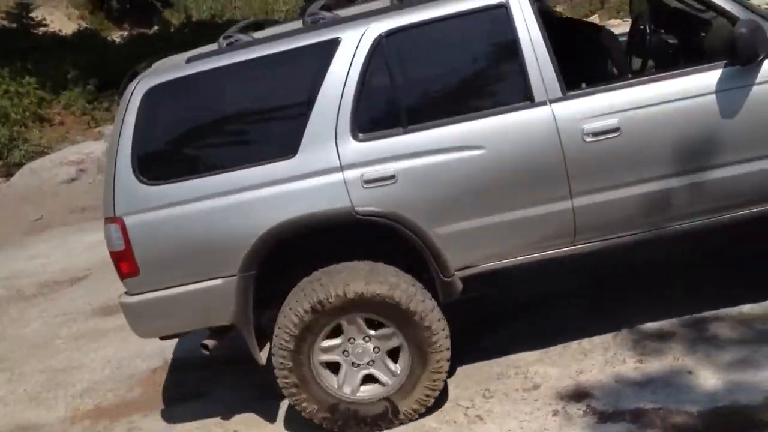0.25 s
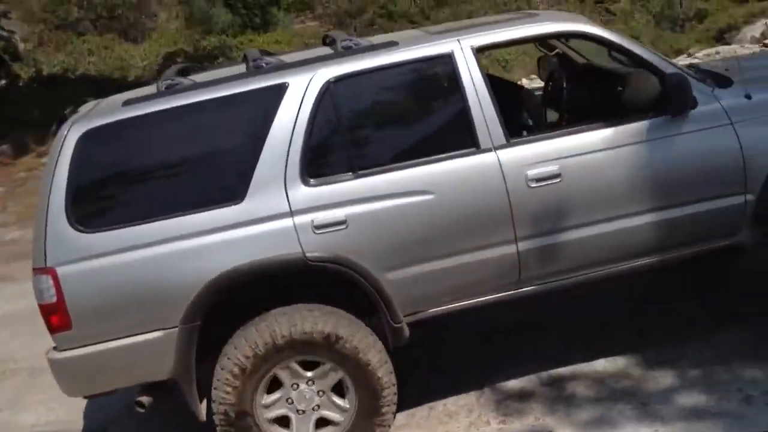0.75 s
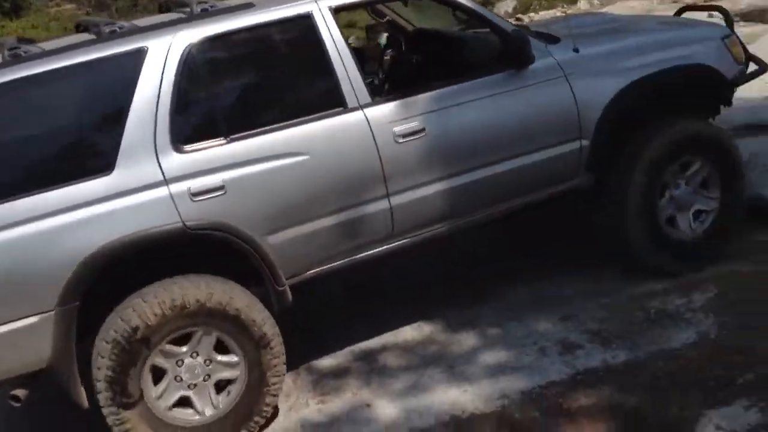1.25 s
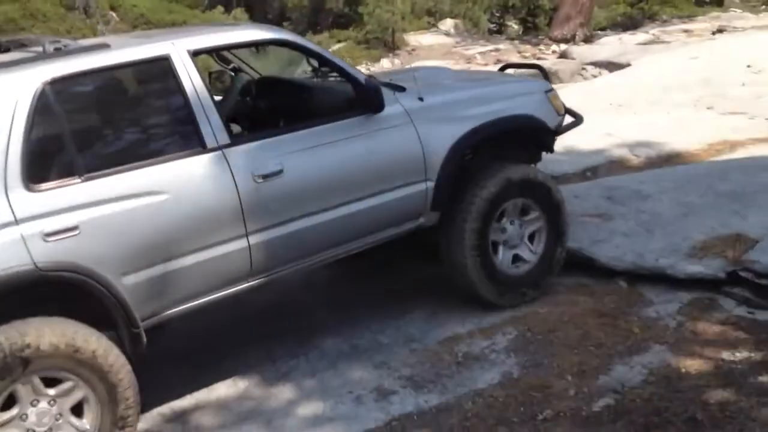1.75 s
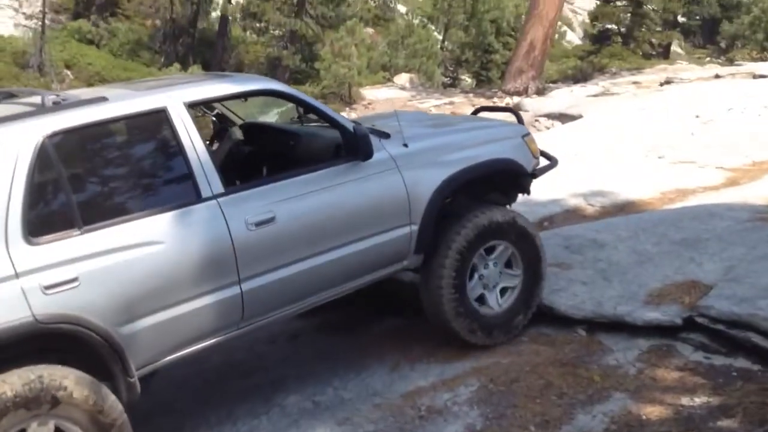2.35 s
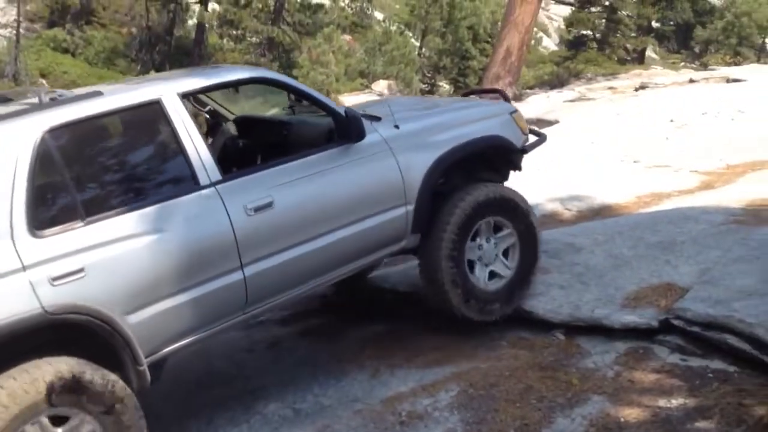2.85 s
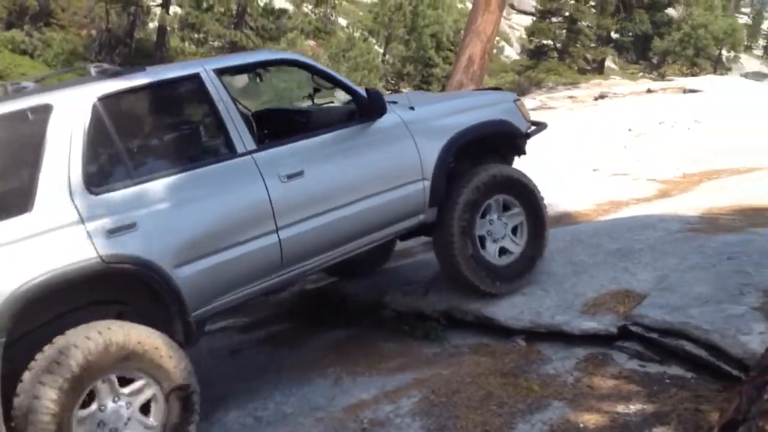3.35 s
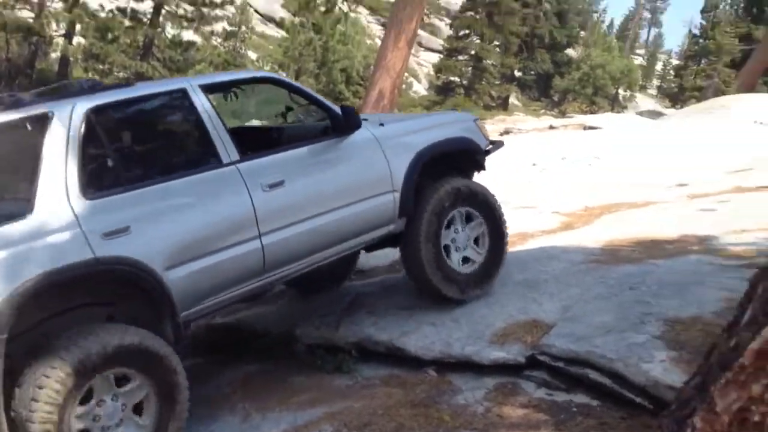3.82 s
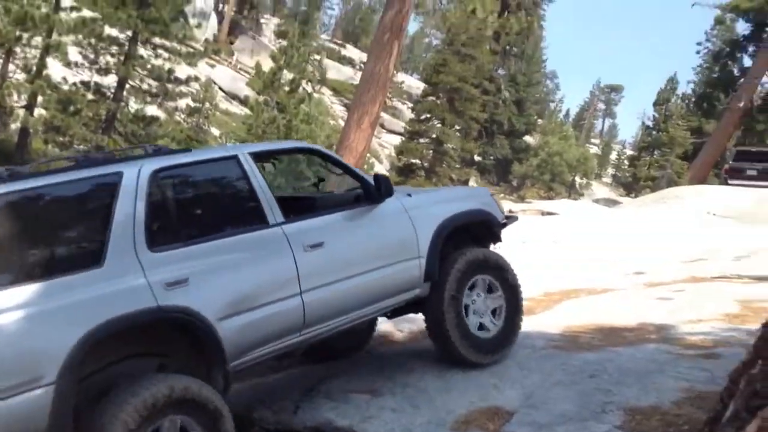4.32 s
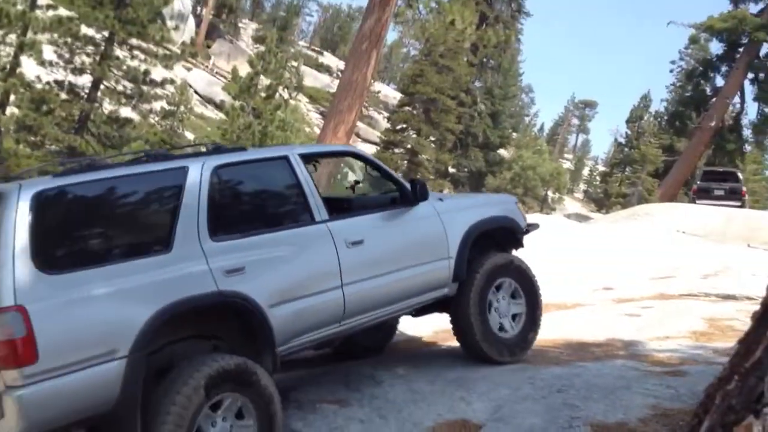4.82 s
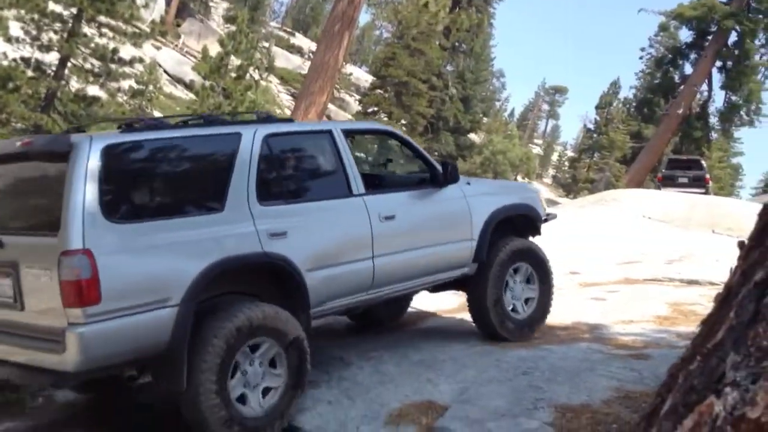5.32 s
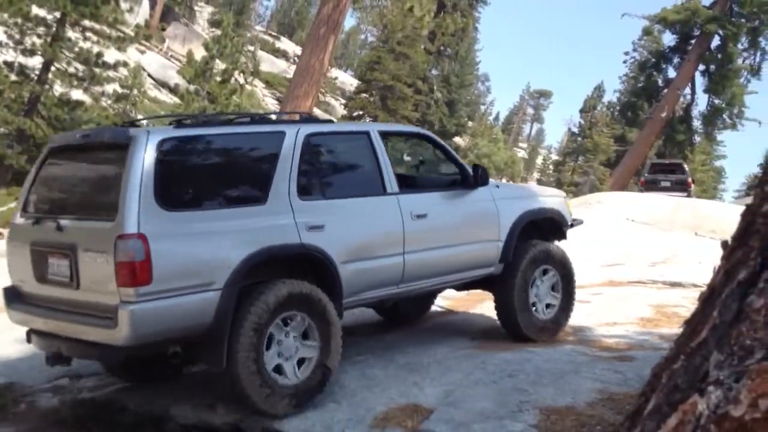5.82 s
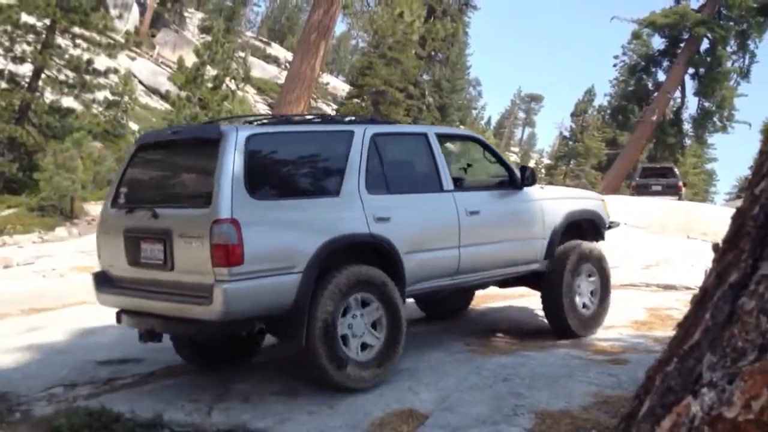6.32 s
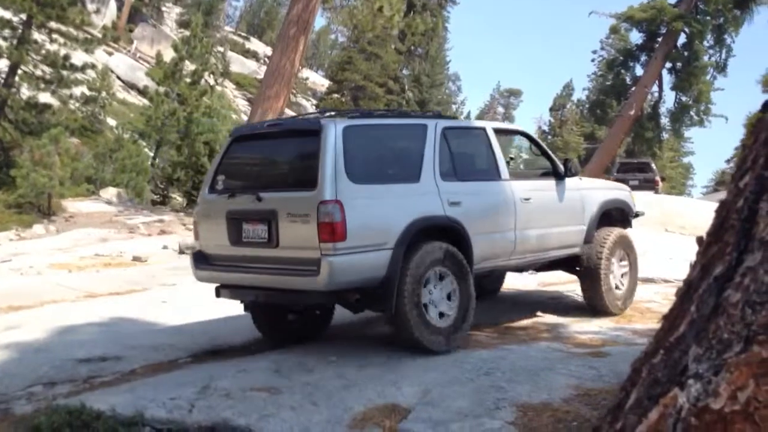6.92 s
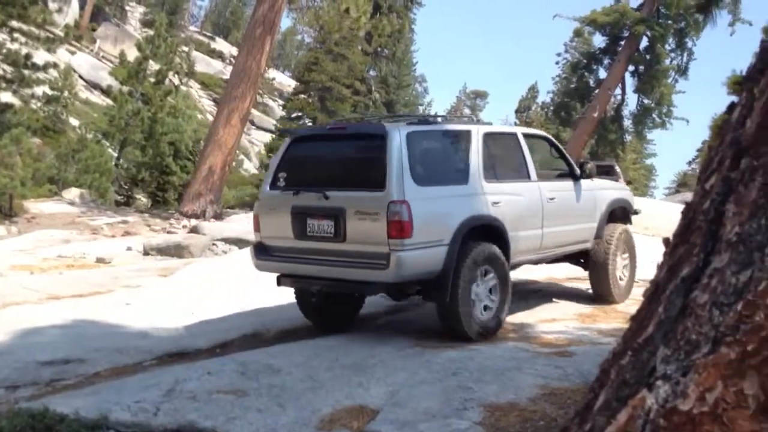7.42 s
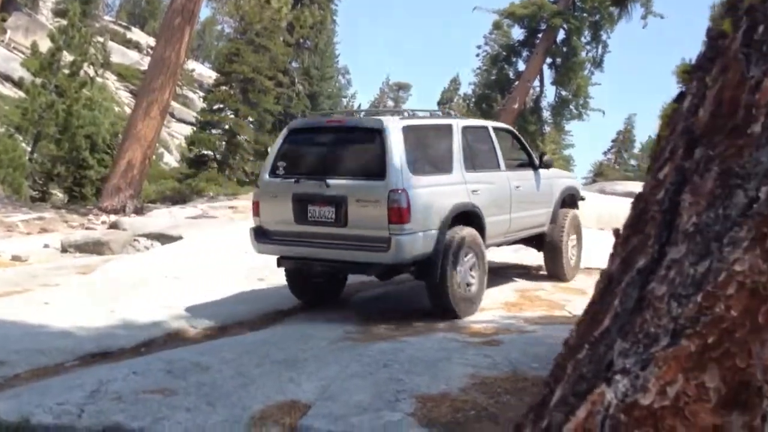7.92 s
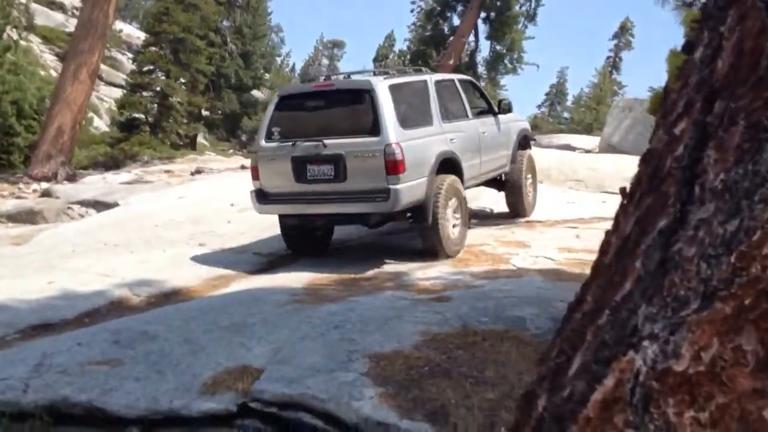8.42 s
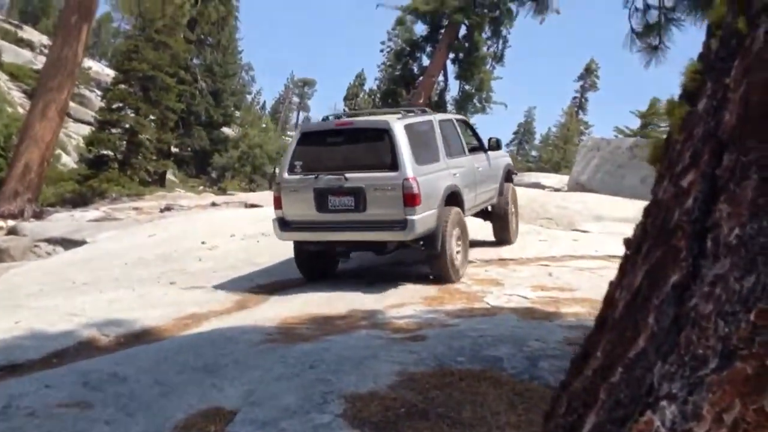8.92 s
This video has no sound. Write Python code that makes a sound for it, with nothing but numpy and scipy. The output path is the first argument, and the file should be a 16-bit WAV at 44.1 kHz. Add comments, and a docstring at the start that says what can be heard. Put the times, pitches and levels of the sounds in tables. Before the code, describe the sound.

Low, throbbing engine idles and climbs a granite slab, revs briefly, then hums away as tyres crackle over grit and nearby stones clack.

```python
"""The exhaust of a lifted V6 four-by-four dominates: two banks of firing pulses ring one tailpipe as it crawls
up a granite slab, past the listener and away, with one short rev that adds a growl of throbbing noise.
A swept sine makes the engine hum; filtered noise and ringing grains make the rush of fan and tyres, the grinding
and the low rumble. Wavering tones squeak, brief rings and noise bursts crack, and near the end stones knock close by."""
import sys
import numpy as np
from scipy import signal
from scipy.fft import rfft, irfft
from scipy.io import wavfile
from scipy.ndimage import uniform_filter1d

SR = 44100
rng = np.random.default_rng(int(sys.argv[2]) if len(sys.argv) > 2 else 0)


def unload_wav(signal):
    """Save mono or channel-first audio to the path in sys.argv[1] as 16-bit WAV at rate SR, clipped to [-1, 1]."""
    wavfile.write(
        sys.argv[1],
        SR,
        np.round(np.clip(np.atleast_2d(signal).T, -1, 1) * 32767).astype(np.int16),
    )


N = 404382  # samples

# Engine speed. Each row: time in seconds, firings per second in one bank of three cylinders.
ENGINE_SPEED = [(0.0, 30.9), (0.1, 28.5), (0.2, 26.5), (0.33, 24.6), (0.49, 26.6), (0.65, 29.0),
                (0.78, 29.8), (0.9, 28.9), (1.05, 27.3), (1.2, 26.7), (1.5, 27.0), (1.68, 28.1),
                (1.86, 30.1), (2.21, 32.8), (2.41, 33.7), (2.62, 40.3), (2.8, 42.8), (2.95, 39.5),
                (3.13, 35.6), (3.37, 34.4), (4.0, 36.1), (4.42, 33.4), (5.14, 35.9), (5.52, 34.4),
                (5.82, 38.0), (6.4, 39.2), (6.78, 40.5), (7.2, 40.5), (7.46, 38.5), (8.48, 39.8),
                (8.9, 39.7), (9.17, 39.1)]
# Strength of each cylinder in firing order, the two banks in turn: one value each, in dB at REFERENCE_RATE.
CYLINDER_STRENGTHS = [4.5, -1.5, 5.5, -1.5, 4.5, 2]
# Tailpipe and silencer response. Each row: frequency in Hz, then gain in dB heard from beside,
# at the rear wheel, at the rear quarter and from behind.
PIPE_RESPONSE = [(55.0, -43.5, -40, -57, -38), (77.6, -37.0, -36.0, -25, -24.5), (92, -20, -23, -21, -18.0),
                 (105.3, -48, -13, -12.0, -4.5), (119.6, -7, -13.5, 1, -2), (133.6, 3.5, 0, 1.5, 8.5),
                 (151.4, -22, -5.5, -2, -6.5), (168, -16, -20, -15, -11), (183, -30.5, -13.5, -8, -11.5),
                 (216, -26.5, -17.5, -40, -12), (235.0, -8.5, -18, -7.5, -14),
                 (255, -9.5, -7.5, -9.0, -9.0), (271.8, -14.5, -11.5, -9.5, -7.5),
                 (278.8, -26, -17.5, -16.5, -18), (284.5, -33, -26, -29, -18), (294, -45, -35.0, -28, -43),
                 (326, -47, -26.5, -22, -42), (340, -27, -23.0, -21.5, -31),
                 (358.0, -23.5, -16.5, -39, -28), (376, -47, -26, -23.5, -20.5),
                 (420.0, -71, -52, -37, -35.5)]
# Exhaust drive set by throttle and distance. Each row: time in seconds, relative level in dB.
EXHAUST_LOAD = [(0.0, -35.5), (0.5, -31.5), (0.8, -30.5), (1.3, -33), (1.8, -31), (2.4, -23), (2.85, -19.5),
                (3.05, -27.0), (3.4, -25.5), (4.3, -30.5), (4.6, -29.5), (5.6, -33), (6.3, -35.5),
                (7.2, -33), (7.4, -37.0), (9.17, -39.5)]
# The side of the truck that faces the listener. Each row: time in seconds,
# side (0 beside, 1 rear wheel, 2 rear quarter, 3 behind).
FACING_SIDE = [(1.8, 0), (2.45, 1), (3.9, 1.5), (4.6, 2), (5.5, 2), (5.95, 2.5), (7.1, 3)]
# Hollow resonances of the roar under throttle. Each row: frequency in Hz, density in dB per Hz.
ROAR_COLOUR = [(250, -32), (430, -2), (540, 0), (620, -8), (720, 1), (950, -3.5), (1250, -6.5),
               (1700, -16.5), (2800, -15), (4500, -21), (6500, -23), (12000, -42)]
# Engine hum from uneven cylinders. Each row: time in seconds, level in dB.
ENGINE_HUM_LEVEL = [(0, -67), (2.6, -54), (3.6, -66), (5.5, -44), (6.1, -49), (6.9, -45), (7.7, -47),
                    (9.17, -48)]
HUM_RATIO = 5.29  # hum pitch as a multiple of one bank's firing rate, near 16/3

# Tyre slips that grind grit. Each row: start in seconds, end in seconds, relative level in dB,
# treble in dB against that level.
TYRE_SLIPS = [(0, 0.197, -41, -10.5), (0.22, 0.36, -45.5, -8), (0.592, 0.652, -44, -8),
              (0.864, 0.97, -39, -14), (1.21, 1.358, -44, -11), (0.988, 1.16, -43, -17),
              (1.933, 2.082, -41.5, -26), (2.16, 2.25, -38.5, -23), (2.866, 2.95, -36.5, -9),
              (3.28, 3.367, -45.5, -5), (3.895, 3.977, -47.5, 4.5), (5.147, 5.305, -47.5, 2.5),
              (5.46, 5.556, -40, -5), (5.54, 5.77, -36, -11.5), (6.068, 6.217, -53, 4.5),
              (6.356, 6.45, -41, -4), (7.076, 7.19, -47.5, -3.5), (7.768, 7.85, -43, -3),
              (7.927, 7.973, -47, 2), (8.092, 8.132, -44, -6), (9.127, 9.186, -49.5, 4)]
# Rubber rasping on granite. Each row: frequency in Hz, density in dB per Hz.
RASP_COLOUR = [(300, -14), (600, -1), (800, 0), (1150, 4.5), (1550, -1.5), (2000, 3.5), (2600, -6.5),
               (3400, -3), (4500, -4), (5500, -12), (7500, -12.5), (10000, -21), (15000, -27)]
# Rubber squeaking on smooth rock. Each row: start in seconds, length in seconds, level in dB, pitch in Hz.
TREAD_SQUEAKS = [(1.378, 0.018, -52, 2100), (3.338, 0.033, -46.5, 2300), (5.315, 0.036, -49, 1800),
                 (5.638, 0.11, -49, 2020), (5.738, .03, -42.5, 997), (6.112, 0.046, -51, 1836),
                 (7.095, 0.025, -53, 1720)]
# Grit cracking under the tread. Each row: start in seconds, relative level in dB, centre in Hz,
# spray decay time (t60) in seconds.
GRIT_CRACKS = [(.038, -31, 6200, .045), (.0505, -22, 3600, .018), (.15, -29, 1150, .045),
               (.328, -32, 1700, .04), (.4305, -27.5, 1350, .036), (.515, -34, 2800, .018),
               (.593, -31, 1400, .03), (.602, -29, 3000, .016), (.9223, -31, 8000, .01),
               (.947, -31, 1250, .036), (1.1015, -26, 1300, .028), (1.1185, -28, 1300, .032),
               (1.5275, -31, 1250, .028), (2.5441, -28, 3900, .018), (2.844, -25, 6500, .012),
               (3.680, -24.5, 1050, .025), (3.7244, -31, 1100, .04), (4.2083, -29, 2600, .012),
               (4.3211, -31, 4300, .025), (4.6748, -34, 4000, .025), (5.5464, -27.5, 1150, .032),
               (6.0886, -31, 2100, .025), (6.1744, -29, 2200, .018), (6.3695, -27.5, 2400, .025),
               (6.384, -26.5, 1300, .03), (6.5296, -32, 2000, .012), (6.5451, -27, 2700, .028),
               (6.555, -31, 4000, .016), (6.5655, -31, 4400, .02), (7.1012, -31, 1720, .035),
               (7.9378, -36, 920, .03), (8.0874, -33, 2000, .025), (8.1115, -34, 4000, .025),
               (8.2506, -36, 1970, .02), (8.267, -26.5, 1550, .026), (8.5684, -32, 1270, .04),
               (9.0287, -27, 2300, .018)]
# Stones knocking. Each row: start in seconds, relative level in dB, body pitch in Hz,
# relative click level in dB against the body.
STONE_KNOCKS = [(8.879, -30, 700, -8), (8.9235, -29, 600, 3), (8.929, -24, 590, -10),
                (8.9345, -21.5, 640, -8), (8.9402, -23.5, 740, -8), (8.969, -37, 620, 3),
                (9.0160, -24.5, 850, -6), (9.029, -20.5, 870, -5), (9.0415, -28, 900, -7),
                (9.053, -34, 800, 0), (9.0760, -22, 730, -6), (9.118, -37, 900, 2), (9.141, -36, 800, 3),
                (9.1472, -27, 700, -3), (9.159, -33, 1100, -1)]
# The stones' click. Each row: frequency in Hz, gain in dB.
CLICK_COLOUR = [(500, -14), (1100, 16.5), (1600, 6), (2300, 6), (3300, 3), (4600, 7), (6500, -5),
                (9000, -25), (15000, -33)]
# Dull bumps among the stones. Each row: start in seconds, level in dB of each mode, lower mode in Hz,
# decay time (t60) in seconds.
DULL_BUMPS = [(9.029, -28, 205, .03), (9.056, -18, 168, .035)]

# Fan and rolling tyres. Each row: time in seconds, level in dB at REFERENCE_RATE,
# relative treble in dB against that level.
RUSH_LEVEL = [(0, -43, -4), (1.5, -42.5, -7.5), (2.1, -40, -5.5), (2.6, -43, -1), (2.9, -41, -5),
              (3.05, -43, -5), (4.1, -41.5, -3.5), (4.5, -44.5, -4.5), (5.4, -43, -5), (6.3, -44, -3),
              (7.5, -46.5, -7), (9.17, -45.5, -5.5)]
# The rush grows louder with engine speed, relative to this rate (firings per second in one bank).
REFERENCE_RATE, RUSH_DB_PER_OCTAVE = 44, 6
# Colour of the rush from each side. Each row: frequency in Hz, density in dB per Hz.
BESIDE_COLOUR = [(260, -10), (450, 0.5), (590, -9.5), (920, -3.5), (1300, -4.5), (1870, -5.5), (2290, -7),
                 (3670, -16.5), (4060, -17.5), (5060, -22.5), (5610, -18.5), (6310, -14), (7980, -17.5),
                 (9800, -21.5), (12200, -18.5), (15000, -28)]
WHEEL_COLOUR = [(260, -25), (450, 5.5), (595, -0.5), (884, 2.5), (1290, -2), (1760, -8), (2160, -3.5),
                (2780, -12), (4710, -17), (5290, -22), (6410, -16), (8220, -20.5), (9800, -23.5),
                (12600, -25), (15000, -33)]
QUARTER_COLOUR = [(260, -31), (450, 3), (545, -6), (821, 0), (1480, -12), (1840, -5.5), (2990, -12),
                  (3360, -18), (3890, -12), (4710, -15.5), (5290, -18.5), (7750, -22.5), (9380, -26.5),
                  (12200, -27.5), (15000, -36)]
BEHIND_COLOUR = [(260, -43), (450, -8.5), (529, -6.5), (741, -3.5), (1130, -12.5), (1220, -13),
                 (1430, -17.5), (1790, -13), (2900, -17), (4640, -13), (5220, -18), (7200, -23.5),
                 (10100, -30), (12000, -31), (15000, -35)]
# Low rumble of drive line and air. Each row: frequency in Hz, density in dB per Hz.
RUMBLE_COLOUR = [(20, -25), (45, -18.5), (80, -12.5), (150, 7.5), (290, 3), (365, -2), (450, -7.5),
                 (650, -26), (1200, -41.5)]
# Microphone dips and one slight rise. Each row: centre in Hz, width in Hz, gain in dB.
MICROPHONE = [(4750, 170, 1.5), (5220, 270, -5.5), (9690, 1240, -7)]


def exhaust(crossover_s=.0021, uneven_db=.34, jitter_s=.00008, lugging=4.0, lopsided=1.2, gas_db=-30):
    """Pulse-excited resonance: six firings a cycle ring the pipe, whose modes swell as firing harmonics meet them.

    The stronger bank arrives late through the crossover pipe, which makes the burble.
    """
    speed = curve(ENGINE_SPEED)
    firing = np.floor(np.cumsum(2 * speed) / SR).astype(int)
    at = np.flatnonzero(np.diff(firing))
    number = firing[at]

    # the slower the engine lugs, the less evenly it fires
    irregularity = (speed.mean() / speed[at]) ** lugging
    strength, timing = rng.standard_normal((len(at), 2)).T * irregularity
    late_s = crossover_s * (number % 2 == 0) + jitter_s * timing

    # and the further the weak cylinders fall behind the strongest
    strongest_db = max(CYLINDER_STRENGTHS)
    weak_db = np.take(CYLINDER_STRENGTHS, number, mode="wrap") - strongest_db
    weak_db = weak_db * (REFERENCE_RATE / speed[at]) ** lopsided

    pulses = np.zeros(N)
    arrival = np.clip(at + np.round(late_s * SR).astype(int), 0, N - 1)
    pulses[arrival] = amp(strongest_db + weak_db + uneven_db * strength)

    gas_noise = amp(gas_db) * pulses.std() * rng.standard_normal(N)
    # each pulse carries the gas of one firing interval
    flow = (pulses + gas_noise) * SR / (2 * speed)
    hz, *sides = np.transpose(PIPE_RESPONSE)
    # the open pipe radiates no deep bass and the silencer swallows the treble
    responses = [[(30, -66), *zip(hz, db), (1300, -85)] for db in sides]
    return amp(curve(EXHAUST_LOAD)) * from_sides(silencer(flow), responses, trailing=0.32)


def silencer(flow, lag_s_per_hz=.000028, top_hz=400):
    """Dispersion: low notes linger in the chambers, leaving later the further they lie below the top."""
    below = np.maximum(top_hz - np.fft.rfftfreq(N, 1 / SR), 0)
    phase = np.pi * lag_s_per_hz * below ** 2
    return irfft(rfft(flow) * np.exp(1j * phase), N)


def roar(level_db=-42, follows=1.56, puff_share=0.4):
    """Modulated flow noise: under open throttle each firing tears off a puff, a growl strongest in the rev."""
    turns = np.cumsum(curve(ENGINE_SPEED)) / SR
    first_bank = np.exp(-(turns % 1) / puff_share)
    second_bank = .5 * np.exp(-((turns + .5) % 1) / puff_share)
    gas = evened(colour((first_bank + second_bank) * rng.standard_normal(N), ROAR_COLOUR))
    load_db = curve(EXHAUST_LOAD)
    return amp(level_db + follows * (load_db - load_db.max())) * gas


def engine_hum(waver_db=2.5):
    """Engine order from uneven cylinders: a swept sine near 16/3 of one bank's rate beats against the drone."""
    turns = np.cumsum(HUM_RATIO * curve(ENGINE_SPEED)) / SR
    level_db = curve(ENGINE_HUM_LEVEL) + waver_db * wander(5.0)
    return amp(level_db) * evened(np.sin(2 * np.pi * turns))


def scrubs(level_db=-4.5, powder_db=-2, attack_s=0.012, release_s=0.0091, catch_db=1.5, catch_hz=30):
    """Sliding friction: a slipping tread grinds grains and powder, catching and letting go until it grips."""
    grains = grit(per_s=4000, spread_db=0.5, clump_db=-0.5, t60=0.026)
    powder = amp(powder_db) * rng.standard_normal(N)
    rasp = colour(grains + powder, RASP_COLOUR)
    body, treble = body_and_treble(rasp * amp(catch_db * wander(catch_hz)))
    out = np.zeros(N)
    for start, end, db, treble_db in TYRE_SLIPS:
        span = slice(max(int(start * SR), 0), int(end * SR))
        slip = evened(body[span]) + amp(treble_db) * evened(treble[span])
        t = np.arange(len(slip)) / SR
        edges = np.minimum(np.minimum(t / attack_s, (t[-1] - t) / release_s), 1)
        add(out, start, amp(level_db + db) * edges * slip)
    return out


def squeaks(waver=0.021, upper=1.75, upper_db=-9):
    """Stick-slip oscillation: a tread block sticks and slips so fast that it chirps, here as two wavering tones."""
    out, drift = np.zeros(N), wander(120)
    for s, length, db, hz in TREAD_SQUEAKS:
        size = int(length * SR)
        turns = np.cumsum(hz * (1 + waver * drift[int(s * SR):][:size])) / SR
        tone = np.sin(2 * np.pi * turns) + amp(upper_db) * np.sin(2 * np.pi * upper * turns)
        add(out, s, amp(db) * evened(np.hanning(size) * tone))
    return out


def cracks(spray_db=-2.5, ring_share=.69, upper=1.72):
    """Impulsive fracture: a splitting pebble gives a short spray of noise and a brief two-mode ring."""
    out, t = np.zeros(N), np.arange(SR // 8) / SR
    for s, db, hz, t60 in GRIT_CRACKS:
        band = [(hz / 4, -24), (hz / 2, -8), (hz, 0), (hz * 1.6, -3), (hz * 3, -20), (hz * 7, -40)]
        spray = colour(rng.standard_normal(len(t)) * amp(-60 * t / t60), band, size=1024)
        spray = spray / abs(spray).max()
        tone = sum(ring(f, ring_share * t60, rise_s=1 / hz) for f in (hz, hz * upper))
        add(out, s, amp(db) * (amp(spray_db) * spray + .3 * tone))
    return out


def stones(body_db=3.0, click_db=-1.5, body_t60=.025, click_t60=.018, upper=1.45, upper_db=-9,
           lower=.76, lower_db=-6, scatter_db=-17, scatter_t60=.11):
    """Impact excitation: knocks ring three hollow modes under a click and scattering grit; dull bumps join them."""
    out, t = np.zeros(N), np.arange(SR // 8) / SR
    for s, db, hz, bright_db in STONE_KNOCKS:
        fade = amp(-60 * t / click_t60) + amp(scatter_db - 60 * t / scatter_t60)
        click = colour(rng.standard_normal(len(t)) * fade, CLICK_COLOUR, size=1024)
        click = click / abs(click).max()
        body = ring(hz, body_t60)
        body = body - amp(upper_db) * ring(hz * upper, body_t60)
        body = body - amp(lower_db) * ring(hz * lower, body_t60)
        add(out, s, amp(db) * (amp(body_db) * body + amp(click_db + bright_db) * click))
    for s, db, hz, t60 in DULL_BUMPS:
        add(out, s, amp(db) * (ring(hz, t60) + ring(hz * 1.77, t60)))
    # small stones radiate little bass
    return signal.sosfilt(signal.butter(2, 110, "highpass", fs=SR, output="sos"), out)


def rush(grit_db=-5, pebble_db=-17, flutter_db=1.76, treble_db=-0.52):
    """Broadband flow and contact noise: fan air, crunching tyres and odd pebbles grow louder with engine speed."""
    air = rng.standard_normal(N) * amp(flutter_db * wander(15.0))
    crunch = grit(per_s=1500, spread_db=0.5, clump_db=0.5, t60=0.028)
    pebbles = grit(per_s=14, spread_db=0.0, clump_db=1.5, t60=0.045)
    sound = air + amp(grit_db) * crunch + amp(pebble_db) * pebbles
    sides = [BESIDE_COLOUR, WHEEL_COLOUR, QUARTER_COLOUR, BEHIND_COLOUR]
    body, treble = body_and_treble(from_sides(sound, sides))
    level_db = curve(RUSH_LEVEL) + RUSH_DB_PER_OCTAVE * np.log2(curve(ENGINE_SPEED) / REFERENCE_RATE)
    return amp(level_db) * (body + amp(treble_db + curve(RUSH_LEVEL, column=2)) * treble)


def rumble(level_db=-21, follows=0.66):
    """Low-frequency random vibration of the drive line and air; its level follows a share of the load in dB."""
    noise = evened(colour(rng.standard_normal(N), RUMBLE_COLOUR))
    return amp(level_db + follows * curve(EXHAUST_LOAD)) * noise


def grit(per_s, spread_db, clump_db, t60, count=24):
    """Random impacts: clumps of crushed grains tick at many pitches; t60 is the decay in seconds at 1000 Hz."""
    grain_db = spread_db * np.minimum(rng.exponential(1, N), 3) + clump_db * wander(4.5)
    size = (rng.random(N) < per_s / SR) * amp(grain_db)
    kind = rng.integers(0, count, N)
    pitches = np.geomspace(700, 13000, count) * rng.uniform(0.95, 1.05, count)
    out = np.zeros(N)
    for k, hz in enumerate(pitches):
        # small grains ring higher and shorter
        tick = hz * ring(hz, t60 * 1000 / hz, rise_s=.00005)[:SR // 30]
        out += signal.oaconvolve(size * (kind == k), tick)[:N]
    return evened(out)


def ring(hz, t60, rise_s=0.0021):
    """Damped oscillation: one dying mode with a soft start."""
    t = np.arange(SR // 8) / SR
    return np.sin(2 * np.pi * hz * t) * amp(-60 * t / t60) * (1 - np.exp(-t / rise_s))


def from_sides(x, responses, trailing=1):
    """Directivity: colours x for each side of the truck and blends them as it turns away."""
    angle = curve(FACING_SIDE)
    out = np.zeros(N)
    for k, response in enumerate(responses):
        share = np.maximum(1 - abs(angle - k), 0)
        out += share * colour(x, response, trailing)
    return out


def colour(x, points, trailing=1, size=16384):
    """Linear filtering by (Hz, dB) points; the ring trails each pulse (1) or swells and fades evenly around it (0)."""
    f, db = np.transpose(points)
    hz = abs(np.fft.fftfreq(size, 1 / SR))
    log_gain = np.log(amp(np.interp(np.log(hz + 1), np.log(f + 1), db)))
    # the Hilbert transform of the log gain gives the minimum phase
    phase = -trailing * signal.hilbert(log_gain).imag
    taps = np.fft.ifft(np.exp(log_gain + 1j * phase)).real
    return signal.oaconvolve(x, np.fft.fftshift(taps))[size // 2:][:len(x)]


def body_and_treble(sound):
    """Band division: two bands, each held at a steady level."""
    return [steadied(band, 0.62) for band in split(sound, 2920)]


def split(x, hz, order=6):
    """Complementary filtering: a zero-phase low band and the remainder."""
    low = signal.sosfiltfilt(signal.butter(order, hz, fs=SR, output="sos"), x)
    return low, x - low


def steadied(x, seconds):
    """Level normalisation: holds the slow level at 1 and keeps the quick throb."""
    size = int(seconds * SR)
    power = uniform_filter1d(uniform_filter1d(x ** 2, size), size)
    return x / np.sqrt(abs(power) + 1e-20)


def wander(hz):
    """Low-passed noise: smooth chance of unit RMS that changes about hz times a second."""
    spectrum = rfft(rng.standard_normal(N))
    return evened(irfft(spectrum / (1 + (np.fft.rfftfreq(N, 1 / SR) / hz) ** 4), N))


def evened(x):
    """Power normalisation: scales x to unit RMS."""
    return x / np.sqrt(np.mean(x ** 2) + 1e-20)


def amp(db):
    """Logarithmic level: converts dB to an amplitude ratio."""
    return 10 ** (np.asarray(db) / 20)


def curve(rows, column=1):
    """Linear interpolation: one column of a control table at every sample."""
    rows = np.asarray(rows)
    return np.interp(np.arange(N) / SR, rows[:, 0], rows[:, column])


def add(mix, s, sound):
    """Superposition: adds a sound into the mix from s seconds on."""
    part = mix[max(round(s * SR), 0):][:len(sound)]
    part += sound[:len(part)]


def scene():
    """Superposition of all sources on one channel."""
    engine = exhaust() + roar() + engine_hum()
    tyres = scrubs() + squeaks() + cracks()
    return (engine + tyres + stones() + rush() + rumble())[None]


def record(dry):
    """Transducer response: the microphone's uneven treble, then a band limit."""
    hz = np.fft.rfftfreq(N, 1 / SR)
    response_db = sum(db * np.exp(-((hz - centre) / width) ** 2) for centre, width, db in MICROPHONE)
    heard = irfft(rfft(dry) * amp(response_db), N)
    band_limit = signal.firwin(511, 15400, window=("kaiser", 9), fs=SR)  # cutoff in Hz
    return signal.oaconvolve(heard, band_limit[None], "same")


dry = scene()
out = record(dry)
unload_wav(out)
```